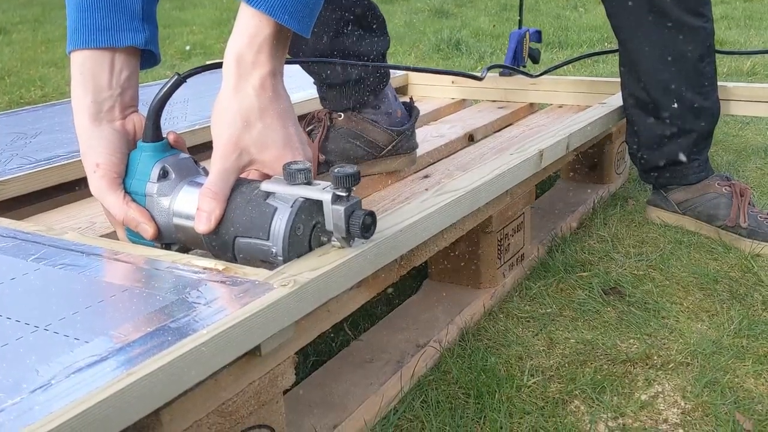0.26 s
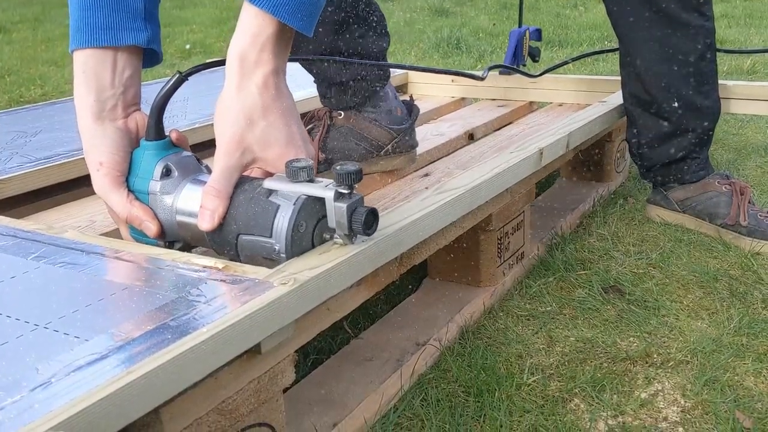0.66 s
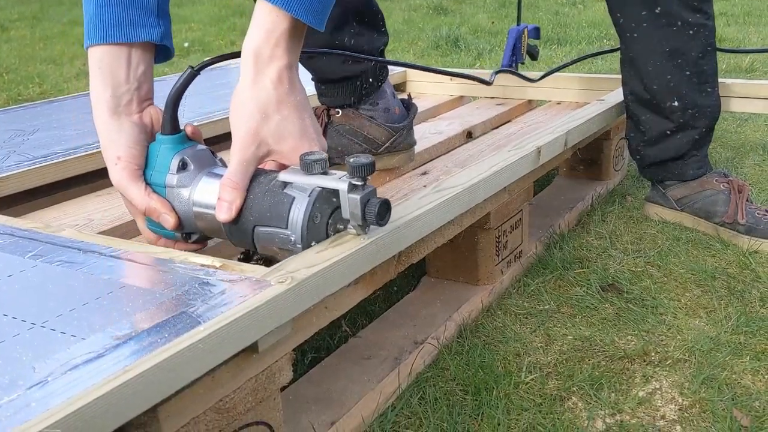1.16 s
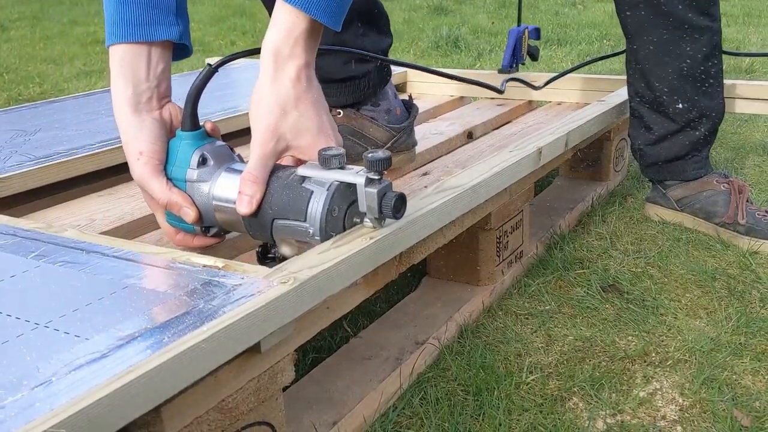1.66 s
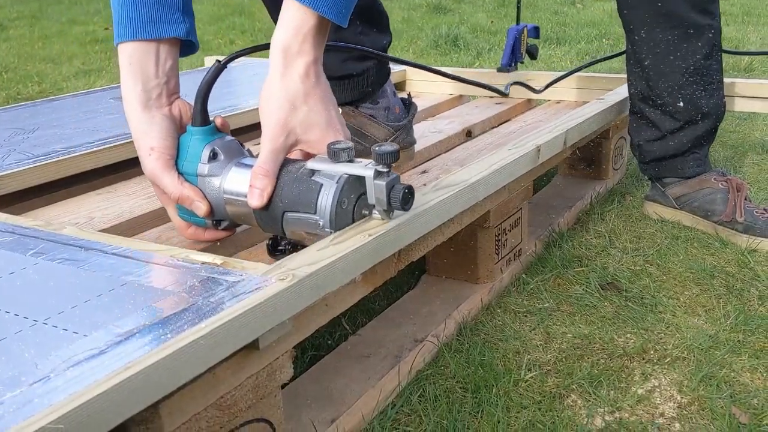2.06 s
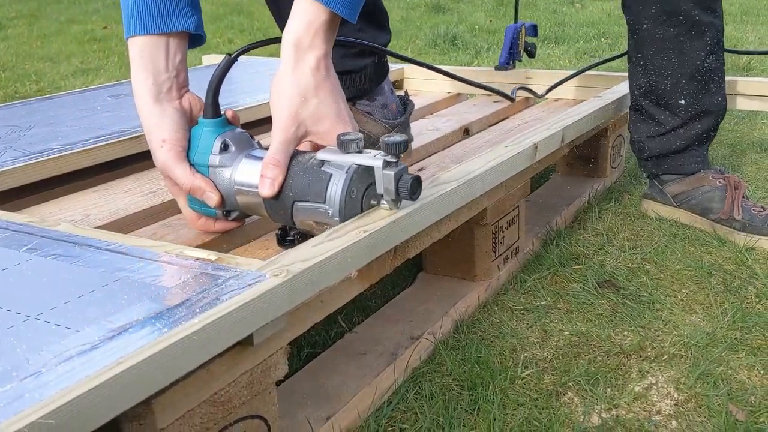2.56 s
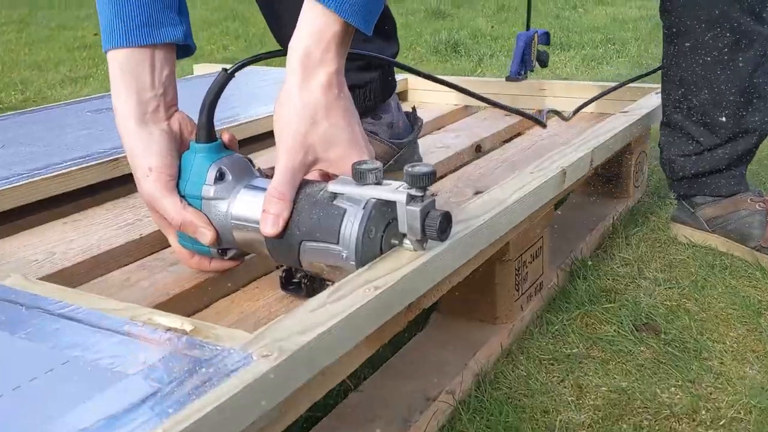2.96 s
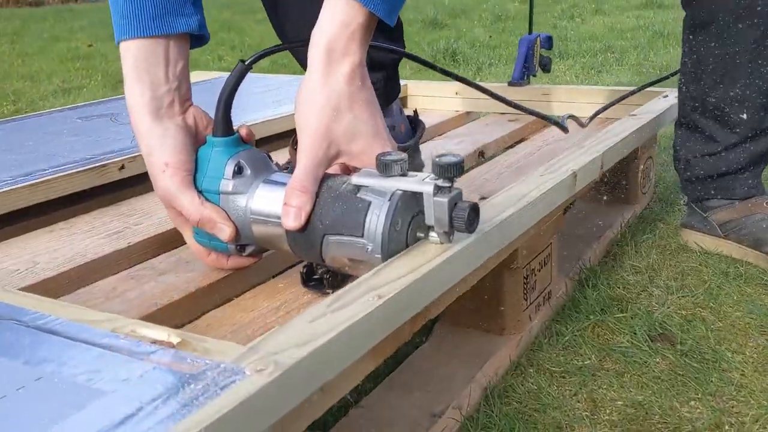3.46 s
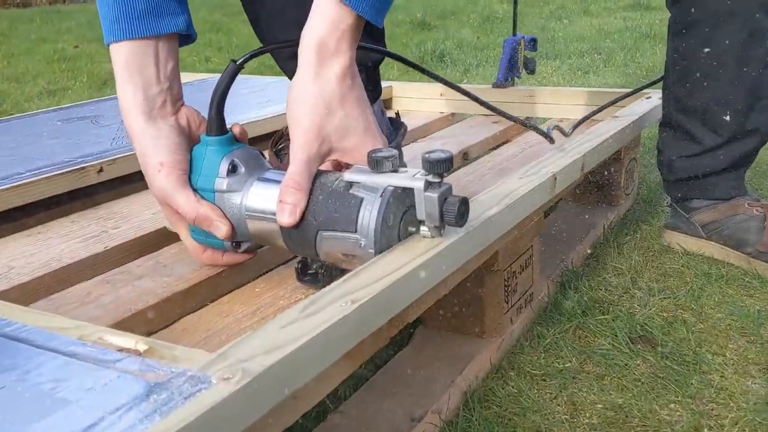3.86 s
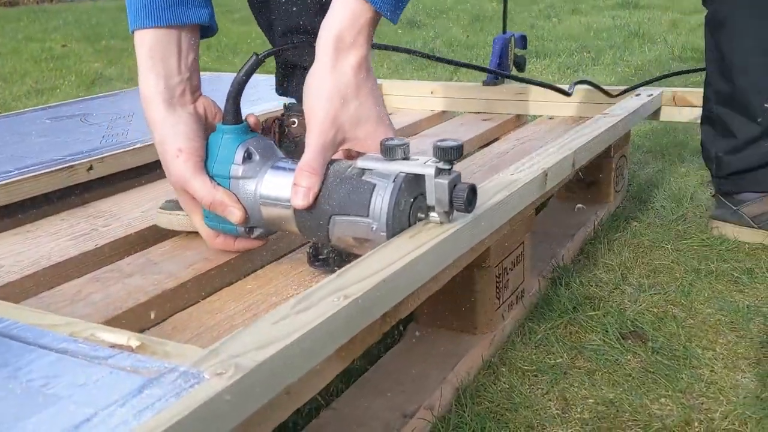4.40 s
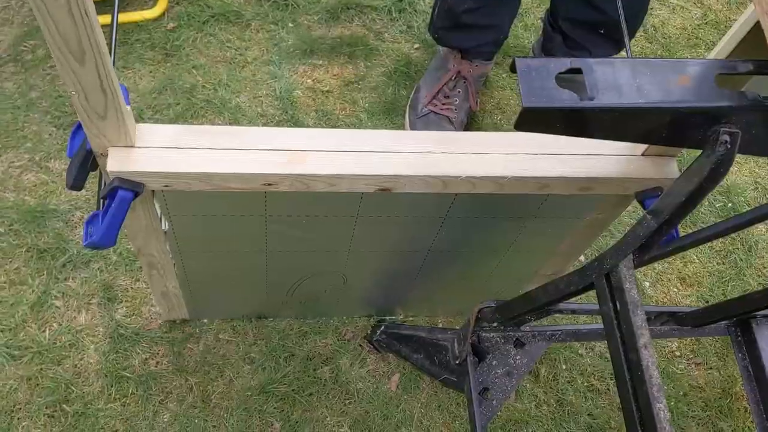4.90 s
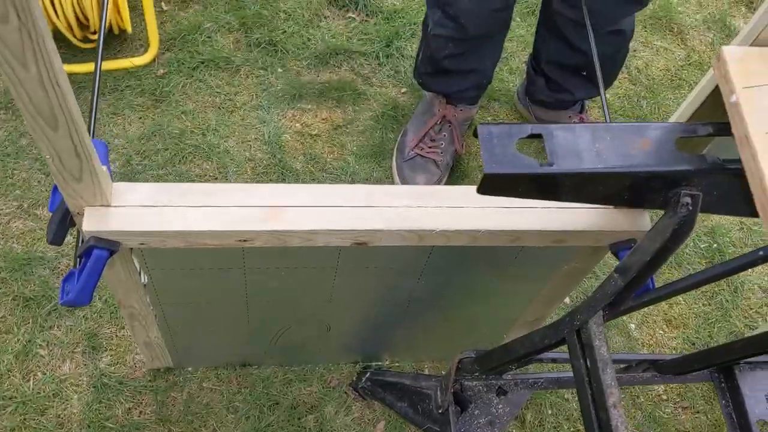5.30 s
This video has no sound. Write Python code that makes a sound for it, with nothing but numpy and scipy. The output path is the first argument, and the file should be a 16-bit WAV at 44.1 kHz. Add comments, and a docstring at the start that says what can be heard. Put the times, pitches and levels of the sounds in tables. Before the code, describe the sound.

A small electric router cuts along a timber frame outdoors, close to a stereo microphone. Its buzzy whine around 400 hertz carries many bright overtones, rough chip noise and airy fan hiss. It sags slightly after one second, where the narrow image opens wide. Near 4.8 seconds a hard cut leaves a much quieter field with faint wash, soft low wind buffets, a tiny rustle and two ticks.

```python
"""A hand router cuts a groove along a timber frame outdoors: sines at multiples of the spindle speed,
chip and fan noise pulsing with each turn, and impulses that ring the resonances of the frame.
The image is narrow and slightly left, then turns wide with the bass in opposite phase.
A hard cut leads to a quiet field: wind turbulence at the microphone ports, a far wash, a rustle and two ticks."""
import sys
import numpy as np
from scipy import signal
from scipy.fft import rfft, irfft, next_fast_len
from scipy.io import wavfile

SR = 44100
rng = np.random.default_rng(int(sys.argv[2]) if len(sys.argv) > 2 else 0)


def persist_wave(psi):
    """Save psi, clipped to +-1, as 16-bit WAV."""
    counts = np.round(np.clip(psi, -1, 1) * 32767).astype(np.int16)
    wavfile.write(sys.argv[1], SR, np.atleast_2d(counts).T)


N = 244314
T = np.arange(N) / SR
WIDE_S, STOP_S = .872, 4.766   # the image turns wide; the router breaks off
LAG_SAMPLES = 3   # right hears later than left while the image is narrow

# rotation of the spindle: (time [s], speed before hunting [turns/s])
SPINDLE_SPEED = [(0.0, 413.9), (0.09, 412.1), (0.28, 415.9), (0.46, 415.7), (0.8, 410.8), (.96, 403.2),
                 (1.11, 392.4), (1.13, 393.5), (1.2, 402.5), (1.31, 399.7), (1.34, 401.5), (1.48, 396.9),
                 (1.59, 400.6), (1.67, 398.2), (1.79, 402.3), (1.89, 397.6), (2.0, 403.5), (2.16, 403.2),
                 (2.27, 398), (2.42, 399.8), (2.63, 405.7), (2.8, 404.7), (2.9, 406), (3.06, 398),
                 (3.1, 401), (3.25, 393.3), (3.3, 394.7), (3.44, 392.9), (3.56, 395.2), (3.64, 391),
                 (3.71, 391.6), (3.78, 397.2), (3.95, 394.5), (4.0, 391.4), (4.21, 392.6), (4.33, 402),
                 (4.45, 395.2), (4.62, 395.6), (4.68, 391.0), (4.76, 392)]
# cutting strength: (time [s], base level of the chips [dB], base level of the air hiss [dB])
CUT_LEVELS = [(0, -38.5, -44.5), (.8, -39, -41.5), (1.03, -40, -41.5), (1.15, -41.5, -50),
              (1.27, -40.5, -45), (1.71, -41, -47.5), (2.5, -40.5, -46.5), (3.17, -40, -44),
              (3.44, -39.5, -46.5), (4.5, -39, -46), (4.64, -42, -45), (4.76, -38.5, -47)]


def amp(db):
    """Decibel law: level to amplitude ratio."""
    return 10 ** (np.asarray(db) / 20)


def pan(db):
    """Interaural level difference: gain that makes left louder than right by db, shared equally."""
    return amp([[db / 2], [-db / 2]])


def rms_one(x):
    """Power normalisation: scaled to rms 1."""
    return x / np.sqrt(np.mean(x ** 2) + 1e-20)


def in_time(rows):
    """Linear interpolation: each column of a curve at every sample."""
    s, *columns = np.transpose(rows)
    return [np.interp(T, s, c) for c in columns]


def at_hz(points, hz):
    """Spectral envelope read on a log-frequency axis, -90 outside its points."""
    point_hz, value = np.array(points).T
    return np.interp(np.log(hz), np.log(point_hz), value, left=-90, right=-90)


def drift(pole_hz):
    """Low-passed random process: coarse noise through two equal one-pole filters; spread 1."""
    step, settle = 100, 800   # samples per coarse step; coarse steps dropped while the filter settles
    r = np.exp(-2 * np.pi * pole_hz * step / SR)
    coarse = rng.standard_normal(N // step + settle + 2)
    slow = signal.lfilter([1], [1, -2 * r, r * r], coarse)[settle:]
    return np.interp(np.arange(N) / step, np.arange(len(slow)), rms_one(slow))


def bump(s, half_s):
    """Fourth-power exponential envelope: a flat-topped hump in time, 1 at its middle."""
    return np.exp(-((T - s) / half_s) ** 4)


def coloured(spectrum):
    """Spectral shaping of two uncorrelated white noises; rms 1 over both."""
    size = next_fast_len(N)
    hz = np.maximum(np.arange(size // 2 + 1) * SR / size, 1)
    white = rfft(rng.standard_normal((2, size)))
    return rms_one(irfft(white * amp(at_hz(spectrum, hz)), size)[:, :N])


def narrow_then_wide(pair):
    """Interaural correlation: right shares the delayed left noise, later mainly its bass, opposed."""
    # while narrow: (frequency [Hz], left-right correlation [-1 to 1])
    early_likeness = [(20, 0.99), (1800, 0.5), (4000, 0.2), (7000, 0.45), (10000, 0.37), (16000, .4)]
    # once wide: (frequency [Hz], left-right correlation [-1 to 1])
    late_likeness = [(20, -0.61), (450, -0.8), (650, -0.31), (2500, -0.14), (16000, 0.19)]
    size = next_fast_len(N)
    hz = np.clip(np.arange(size // 2 + 1) * SR / size, 25, 15000)
    delayed_left = rfft(np.roll(pair[0], LAG_SAMPLES), size)
    own_right = rfft(pair[1], size)
    alike = np.clip([at_hz(early_likeness, hz), at_hz(late_likeness, hz)], -1, 1)
    # power-preserving mix of the shared and the independent part
    mixed = alike * delayed_left + np.sqrt(1 - alike ** 2) * own_right
    early, late = irfft(mixed, size)[:, :N]
    return np.array([pair[0], np.where(T < WIDE_S, early, late)])


def field():
    """Broadband ambience and transients: a far wash, a short rustle and two decaying ticks."""
    # far wash: (time [s], level before drift and panning [dB])
    wash_levels = [(4.77, -56), (4.95, -61), (5.06, -60), (5.14, -57), (5.27, -61.5), (5.36, -60),
                   (5.45, -61.5), (5.54, -61)]
    # spectrum of the wash: (frequency [Hz], relative density [dB])
    wash_colour = [(150, -27), (250, -4.5), (500, -9.5), (785, -10), (918, -6.5), (1420, -13),
                   (1770, -10.5), (2990, -19.5), (6990, -32.5), (12000, -29.5), (15800, -33)]
    # ticks: (onset [s], level before panning [dB], ringing frequency [Hz])
    tick_rows = [(5.1186, -61, 5310), (5.24, -58, 5880)]
    out = amp(in_time(wash_levels)[0] + 0.7 * drift(9)) * coloured(wash_colour)

    # the rustle sets in at once, holds and stops short
    start_s, end_s, edge_s, rustle_db = 5.158, 5.206, .004, -64.5
    outside_s = np.maximum(np.maximum(start_s - T, T - end_s), 0)
    rustle_gain = np.exp(-outside_s / edge_s) * amp(2.0 * drift(60))
    rustle_noise = coloured([(1800, -10), (3800, 3), (6000, -1), (7500, -25)])
    out += rustle_gain * amp(rustle_db) * rustle_noise

    for s, level_db, hz in tick_rows:
        since = np.maximum(T - s, 0)
        click_noise = np.diff(rng.standard_normal(N + 1)) * (T > s)
        snap = np.sin(2 * np.pi * hz * since) + 1.1 * click_noise
        out += amp(level_db) * np.exp(-since / .0016) * snap
    return out * pan(-2.5) * (T > STOP_S - .003)


def wind():
    """Turbulent pressure at the ports: lumpy low noise, deeper and stronger on the right after the cut."""
    # wind up to the cut: (time [s], level before lumps [dB])
    breeze_levels = [(0.0, -60), (1.07, -59), (1.43, -66), (2.23, -69.5), (2.44, -79), (3.87, -68),
                     (3.99, -61), (4.63, -69), (4.76, -56)]
    # spectrum up to the cut: (frequency [Hz], relative density [dB])
    breeze_colour = [(15, -16), (45, -0.5), (100, -7), (200, -10), (330, -36), (500, -60)]
    # spectrum after the cut: (frequency [Hz], relative density [dB])
    gust_colour = [(15, -22), (30, -3.5), (46, -4), (62, -10), (100, -11), (200, -22), (330, -36),
                   (500, -70)]
    # gusts in the field: (middle [s], level before panning [dB], half length [s], thump frequency [Hz])
    gust_rows = [(5.014, -42, 0.014, 60), (5.112, -44, 0.029, 50), (5.199, -36.5, 0.017, 58),
                 (5.255, -37, 0.019, 46.6), (5.316, -38, 0.015, 44), (5.53, -46, 0.018, 45)]
    lull_db, hiss_db = -50.5, -11   # noise floor under the gusts; lumpy noise riding on each gust
    own_lumps_db = [1.0 * drift(8.7) for side in "LR"]
    lumps = amp(2.8 * drift(7) + 1.2 * drift(18) + own_lumps_db)
    breeze = amp(in_time(breeze_levels)[0]) * narrow_then_wide(lumps * coloured(breeze_colour))

    own = lumps * coloured(gust_colour)
    gusts = amp(lull_db) * (own + 0.16 * own[::-1])   # each port hears a little of the other
    for s, level_db, half_s, hz in gust_rows:   # each gust thumps both ports
        phase = rng.uniform(-0.9, 1, (2, 1))
        thump = np.cos(2 * np.pi * hz * (T - s) + phase) + amp(hiss_db) * own
        gusts = gusts + amp(level_db) * np.exp(-((T - s) / half_s) ** 2) * thump
    return np.where(T < STOP_S, breeze, gusts * pan(-6.0))


def cutting(turns):
    """Periodic amplitude modulation: chips tear once a turn and once a flute; the feed is uneven."""
    # spectrum of the chips: (frequency [Hz], relative density [dB])
    chip_colour = [(120, -48), (300, -15), (480, -16), (560, -3.5), (900, -5.5), (1350, -11.5), (1530, -9),
                   (1650, 2), (1950, -2.5), (2250, -8), (2530, -9.5), (2720, -2), (4500, -8), (6000, -10.5),
                   (7400, -16.5), (9000, -15)]
    # spectrum of the fan air: (frequency [Hz], relative density [dB])
    air_colour = [(5000, -28), (7500, -15), (9000, -2), (11500, -0.5), (14000, -3), (16000, -8)]
    chips_db, air_db = in_time(CUT_LEVELS)
    bite = 1 + .13 * np.cos(2 * np.pi * turns) + .2 * np.cos(4 * np.pi * turns)
    feed_db = 1.0 * drift(8.3)
    chips = amp(chips_db + feed_db + 0.8 * drift(26)) * coloured(chip_colour)
    air_gain = amp(air_db + .3 * feed_db + .6 * drift(19)) * pan(-3.9)   # the fan blows to the right
    air = air_gain * coloured(air_colour)
    return narrow_then_wide(bite * (chips + air)) * pan(1.6)   # the cut sits a little left


def rasp(turns):
    """Impulse excitation of resonators: every flute pass knocks the frame with its own strength."""
    # the frame and base plate ring: (frequency [Hz], bandwidth [Hz], relative resonator gain [dB])
    frame_modes = [(1750, 700, -1), (1730, 290, -0.5), (2623, 170, -0.5)]
    narrow_db, wide_db = -5, -8.5   # knocks against the chip level, before and after the image turns wide
    passes = np.diff(np.floor(2 * turns), prepend=0) > 0   # two flutes a turn
    knocks = passes * rng.standard_normal((2, N)) * amp(3.5 * drift(45))   # the bit chatters in bursts
    ring = 0
    for hz, width_hz, gain_db in frame_modes:
        r = np.exp(-np.pi * width_hz / SR)
        poles = [1, -2 * r * np.cos(2 * np.pi * hz / SR), r * r]
        ring = ring + amp(gain_db + 3.2 * drift(12)) * signal.lfilter([1, 0, -1], poles, knocks)
    level_db = in_time(CUT_LEVELS)[0] + np.where(T < WIDE_S, narrow_db, wide_db)
    return amp(level_db) * narrow_then_wide(rms_one(ring))


def tone(turns, multiple, level_db, fade_db, flutter_db, wander):
    """Phase-locked partial of the rotation with random level and phase; a swell upward steadies it."""
    # single orders swell or fade as the router moves along the frame:
    # (middle [s], half length [s], multiple of the spindle speed, left change [dB], right change [dB])
    swell_rows = [(0.32, 0.59, 26, 8, 8.5), (.25, .25, 30, 10, 7), (0.99, 0.21, 30, 15, 6),
                  (0.77, .25, 32, 5, 7), (0.25, 0.33, 6, 7.5, 5), (1.086, 0.035, 6, 14.5, 13.5),
                  (0.987, .06, 6, 6, 8), (1.4, 0.12, 6, 10, 8.5), (1.66, 0.092, 6, 4, 5),
                  (1.03, .11, 3, 4.5, 4), (1.37, 0.16, 3, 5.5, 7.5), (.97, 0.11, 4.58, 10, 6),
                  (1.62, 0.73, 10, -14, -3), (0.98, 0.09, 14, 11, 8), (1.38, 0.27, 14, 6.5, 2),
                  (1.3, 0.51, 26, 7, 0), (1.83, 1, 24, 10, 4), (1.73, 0.47, 2, -7.5, -2.5),
                  (1.92, 0.62, 6, -10.5, 1.5), (2.45, 0.26, 14, 10, 3), (2.28, 0.84, 1.42, -16, -3),
                  (2.6, 0.39, 36, 10, 3), (2.6, 0.27, 30, -2, 5), (2.55, 0.11, 3, -11, -1),
                  (2.84, 0.37, 10, 4, 4.5), (2.77, 0.55, 4.58, 4, 5), (2.75, 0.27, 8, 8, 4.5),
                  (3.02, 0.17, 4, 3.5, 5), (3.5, .2, 12, 3, -5), (3.28, 0.36, 24, 13.5, 2.5),
                  (3.35, .2, 8, 8.5, -2), (3.56, 0.66, 6, 5, -9), (3.75, 0.7, 1, 3, 0.5),
                  (3.82, 0.27, 10, 4.5, 1), (3.7, 0.074, 8, 13.5, 11), (3.98, 0.17, 8, 10, 10),
                  (3.77, .035, .73, 20, 18), (4.05, .35, .73, 15, 13), (4.1, 0.29, 28, -3, 7),
                  (4.765, .03, 2, -10, -10), (4.06, 0.75, 9, 3, 11.5), (4.02, 0.42, 12, 5, 4.5),
                  (4.3, 0.46, 14, 12, 8), (4.28, 0.13, 8, 3.5, 4), (4.4, 0.28, 10, -5, -5),
                  (4.63, 0.45, 22, -14, -8), (4.496, 0.24, 2, 5, 12.5), (4.5, 0.23, 3, 1.5, -18),
                  (4.67, 0.26, 1.42, 1.5, 8), (4.69, 0.13, 4, 4.5, -3)]
    phase = 2 * np.pi * (multiple * turns + rng.random()) + 0.66 * wander * drift(25.4)
    swell_db = np.zeros((2, 1))
    for s, half_s, swelling, left_db, right_db in swell_rows:
        if abs(swelling - multiple) < .05:
            swell_db = swell_db + bump(s, half_s) * np.array([[left_db], [right_db]])
    loose = amp(-1.4 * np.maximum(swell_db.min(axis=0), 0))

    # phase of left ahead of right: the arrival lag while narrow, a slow slip once wide
    early_lead = 2 * np.pi * multiple * SPINDLE_SPEED[0][1] * LAG_SAMPLES / SR
    if multiple < 2:   # the bass is opposed
        late_lead, slip = np.pi, 2 * wander
    else:
        late_lead, slip = 0, 1.5 * loose
    lead = np.where(T < WIDE_S, early_lead + .3 * wander * drift(2), late_lead + slip * drift(1.2))

    unsteady_db = [fade_db * drift(4.0) + flutter_db * drift(19.5) for side in "LR"]
    gain = amp(level_db + swell_db + loose * unsteady_db)
    return np.sqrt(2) * gain * np.sin([phase + lead, phase])


def whine(turns):
    """Order spectrum of a rotor: steady unbalance, rougher cutting and bearing tones that shift in level."""
    # unbalance, two flutes, third and fourth order, two bearing tones; base levels:
    # (multiple of the spindle speed, left while narrow [dB], right while narrow [dB],
    #  left as the image widens [dB], right as it widens [dB], left at the end [dB], right at the end [dB])
    main_tones = [(1, -38, -40, -41, -43, -43, -46), (2, -48.5, -45, -49, -46.5, -41.5, -55),
                  (3, -55.5, -56, -52.5, -51.5, -50, -45.5), (4, -44.5, -48, -50.5, -48.5, -45.5, -66),
                  (4.58, -59, -46.5, -54.5, -52, -49, -48.5), (1.42, -67, -67, -57.5, -62, -50.5, -62.5)]
    # higher spindle orders: (multiple of the spindle speed, left base level [dB], right base level [dB])
    upper_orders = [(5.036, -58, -58), (6.01, -55, -53), (6.99, -61, -54.5), (7.993, -55, -53.5),
                    (8.98, -64, -63.5), (9.99, -52.5, -50.5), (12.03, -56.5, -54), (13, -58, -61),
                    (14, -57.5, -70), (15.98, -65.5, -61), (19.8, -60.5, -64), (22.05, -54.5, -63),
                    (24, -59.5, -64), (26, -59, -58.5), (27.9, -67, -60.5), (30, -66, -57), (32, -59, -64),
                    (34, -68, -56), (35, -70, -68), (36, -61.5, -57.5), (37, -72, -68), (38, -68, -56.5)]
    # weaker tones beside the main ones:
    # (multiple of the spindle speed, base level while narrow [dB], base level once wide [dB])
    side_tones = [(.73, -89, -80), (2.08, -60.5, -69), (2.56, -62, -67), (3.58, -75, -67),
                  (4.08, -54.5, -64), (4.35, -64, -64), (5.08, -60, -54), (6.55, -52, -65),
                  (6.93, -68, -57.5), (7.65, -58, -63.5)]
    # the flutes bite hard and the top orders flare together: (middle [s], half length [s], lift [dB])
    bite_rows = [(1.106, .015, 4.5), (1.455, 0.013, 1), (1.91, 0.022, 5.5), (3.99, .02, 3),
                 (4.17, .035, 4.5), (4.189, .013, 5), (4.35, .015, 4), (4.633, .012, 9)]
    narrow_now = T < WIDE_S
    travel = (T - WIDE_S) / (STOP_S - WIDE_S)   # 0 as the image widens, 1 as the router breaks off
    out = 0
    for multiple, *db in main_tones:
        narrow, start, end = np.reshape(db, (3, 2, 1))
        level_db = np.where(narrow_now, narrow, start + travel * (end - start))
        if multiple == 1:
            out += tone(turns, 1, level_db, fade_db=0.15, flutter_db=0.6, wander=0.06)
        else:
            fade_db, flutter_db = np.where(narrow_now, .6, 1.8), np.where(narrow_now, 1.2, 2.5)
            out += tone(turns, multiple, level_db, fade_db, flutter_db, wander=0.41)

    # the top orders also flicker together at random
    bite_db = 1.5 * drift(14) + sum(db * bump(s, half_s) for s, half_s, db in bite_rows)
    for multiple, *db in upper_orders:
        level_db = np.reshape(db, (2, 1)) + bite_db * (multiple > 21)
        flutter_db, wander = 3.0 + 0.02 * multiple, 0.42 + 0.008 * multiple
        out += tone(turns, multiple, level_db, 2.5, flutter_db, wander)

    for multiple, narrow_db, wide_db in side_tones:
        level_db = np.where(narrow_now, narrow_db, wide_db)
        out += tone(turns, multiple, level_db, fade_db=3.0, flutter_db=4.5, wander=1.76)
    return out


def waver(router):
    """Time-varying band gain: narrow bands waver at random, with brief dips at set times."""
    # (band centre [Hz], random gain spread [dB], dips as (middle [s], half length [s], change [dB]))
    wavering_bands = [(1610, 1.33, [(1.58, .03, -8), (2.63, .015, -10), (2.8, .045, -12),
                      (4.4, 0.13, -6.5)]), (1850, 1.3, [(1.66, .02, -6), (2.53, .02, -10),
                      (2.845, 0.023, -15), (3.44, .04, -8), (3.61, .02, -8)]), (2740, 1.2, [])]
    half_hz = 115   # half width of each band
    out = router
    for hz, spread_db, dips in wavering_bands:
        band_filter = signal.butter(2, [hz - half_hz, hz + half_hz], "band", fs=SR, output="sos")
        band = signal.sosfiltfilt(band_filter, router)
        gain_db = spread_db * drift(11.5) + sum(db * bump(s, half_s) for s, half_s, db in dips)
        out = out + (amp(gain_db) - 1) * band
    return out


def scene():
    """Superposition: the router until the cut, wind throughout, the field after."""
    hunt = .25 * drift(5)   # turns/s: the speed hunts around its curve as the grain changes
    turns = np.cumsum(in_time(SPINDLE_SPEED)[0] + hunt) / SR
    running = np.clip((STOP_S + .002 - T) / 0.008, 0, 1)
    router = waver(whine(turns) + cutting(turns) + rasp(turns))
    return field() + wind() + running * router


def record(dry):
    """Band limiting: a steep low-pass, at least 75 dB down from 16080 Hz up."""
    return signal.sosfilt(signal.cheby2(22, 75, 16080, fs=SR, output="sos"), dry)


dry = scene()
out = record(dry)
persist_wave(out)
```